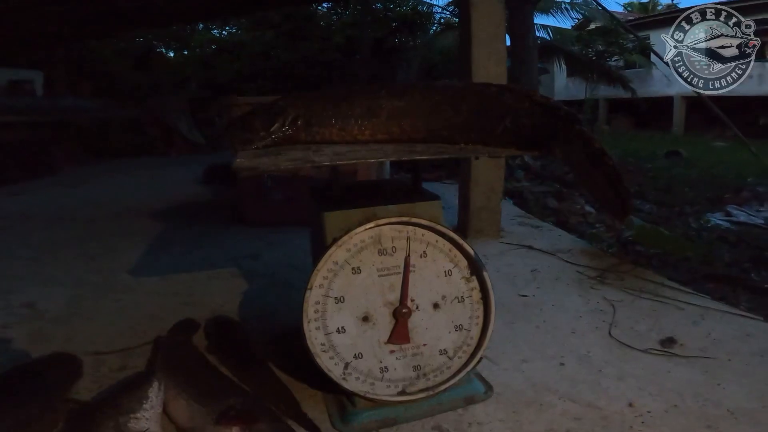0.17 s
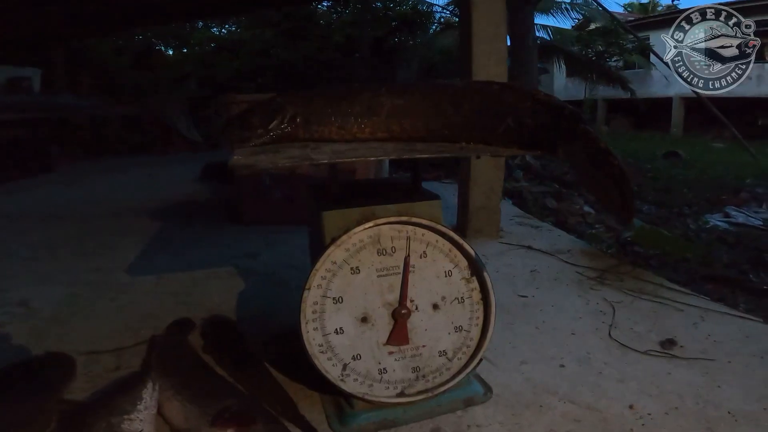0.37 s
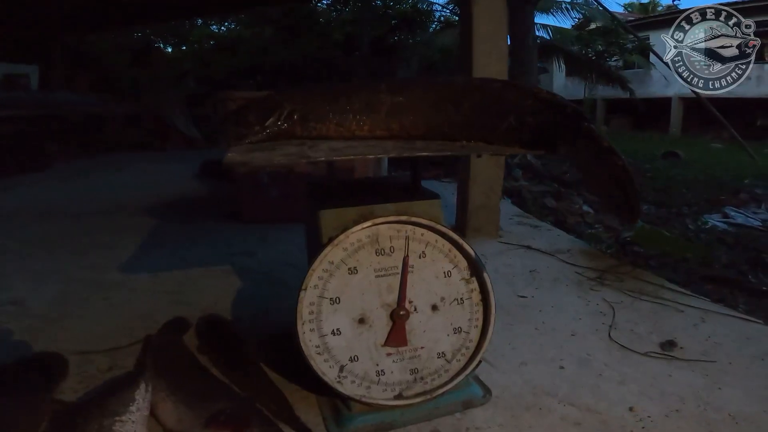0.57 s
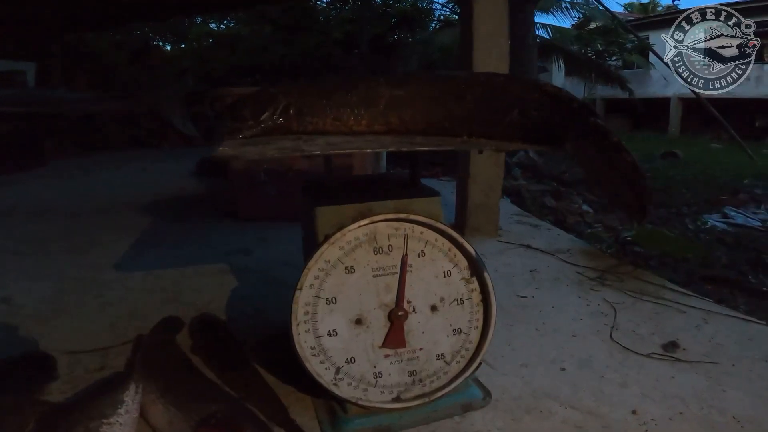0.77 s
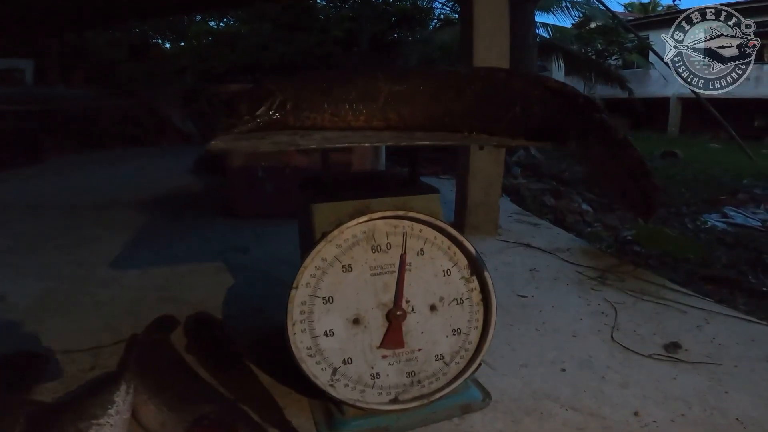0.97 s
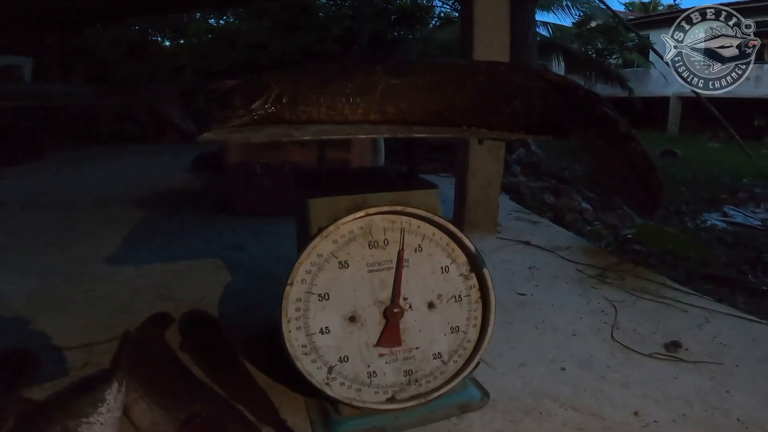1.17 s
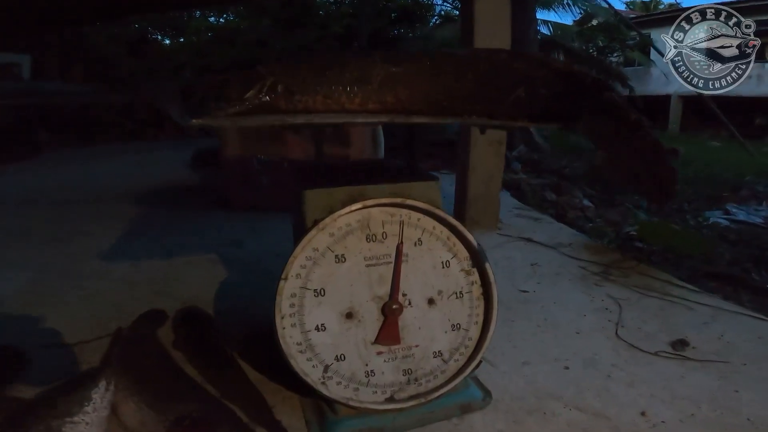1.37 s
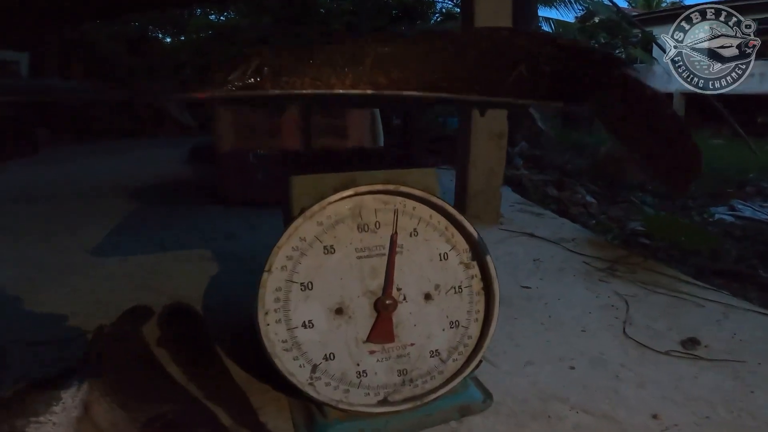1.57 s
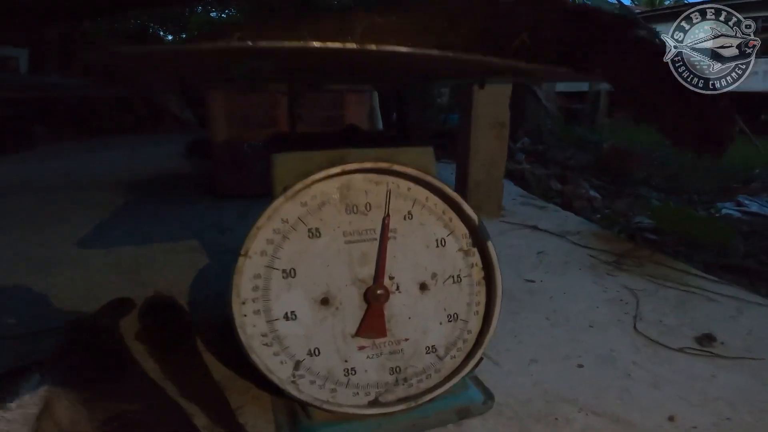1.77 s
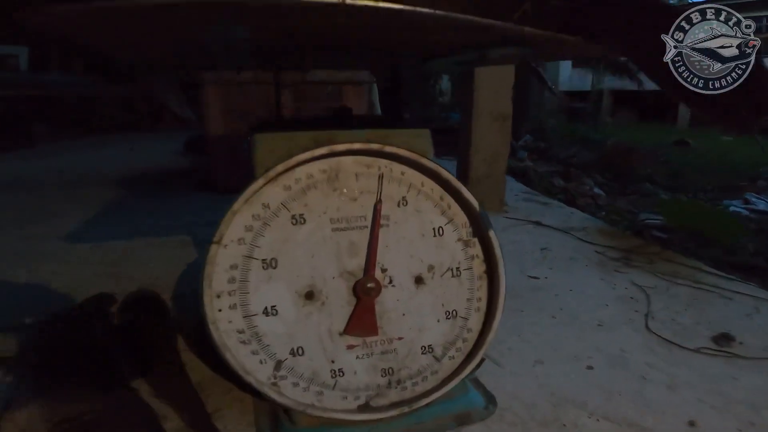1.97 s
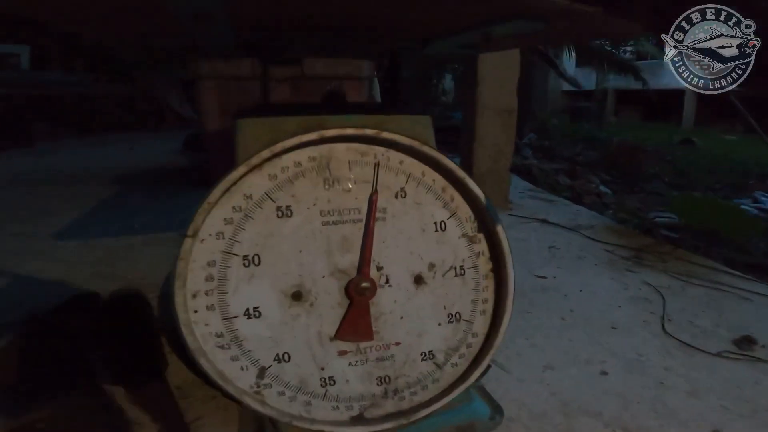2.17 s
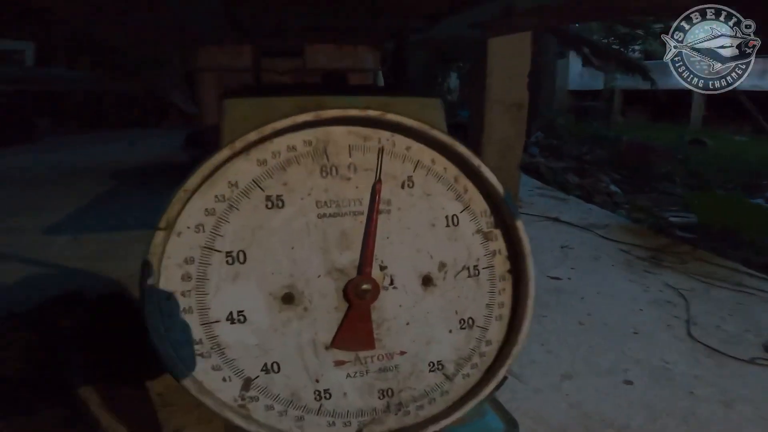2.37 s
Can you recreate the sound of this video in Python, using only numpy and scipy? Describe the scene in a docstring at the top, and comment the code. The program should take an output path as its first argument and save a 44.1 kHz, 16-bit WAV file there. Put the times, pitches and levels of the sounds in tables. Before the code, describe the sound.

Crickets chirp rapidly in step over a low engine rumble, with a hollow knock and light rustling nearby

```python
"""After a short silence the scene fades in: crickets chirp in step five times a second over an engine's rumble.
Their down-swept wing strokes are smeared by garden echoes, while farther insects trill and buzz as pulsing noise.
The engine is wavering sine lines over low noise. Close by, grains of noise scuff and rustle, with light ticks,
and blows in quick succession ring a hollow body as one knock. Soft low bumps come from a moved microphone.
Still evening air, a softly wavering noise, lies under it all."""
import sys
import numpy as np
from scipy import signal
from scipy.fft import rfft, irfft
from scipy.io import wavfile
from scipy.ndimage import uniform_filter1d

SR = 44100
rng = np.random.default_rng(int(sys.argv[2]) if len(sys.argv) > 2 else 0)


def to_wav(s):
    """Save 16-bit WAV."""
    ch = np.atleast_2d(s).T  # columns
    pcm = np.round(np.clip(ch, -1, 1) * 32767)  # PCM
    wavfile.write(sys.argv[1], SR, pcm.astype(np.int16))


N = 106104


def undb(db):
    """Decibels to gain."""
    return 10 ** (np.asarray(db) / 20)


def level(x, db):
    """Set the rms level in dB."""
    return x * undb(db) / np.sqrt(np.mean(x ** 2) + 1e-30)


def clock():
    """Time of each sample in seconds."""
    return np.arange(N) / SR


def noise():
    """White noise for the whole scene."""
    return rng.standard_normal(N)


def walk(rate):
    """Random levels held 1 / rate s and smoothed twice into a slow drift; spread near 1."""
    hold = int(SR / rate)
    steps = np.repeat(noise()[:N // hold + 1], hold)
    return 1.3 * uniform_filter1d(uniform_filter1d(steps, hold), hold)[:N]


def wavering_phase(hz, depth, rate):
    """Running cycle count of a rate in Hz that drifts by a share of itself."""
    return np.cumsum(hz * (1 + depth * walk(rate))) / SR


def colour(x, points):
    """Shape a sound's spectrum by (Hz, dB) points, to rms 1."""
    hz, db = np.array(points).T
    f = np.maximum(np.fft.rfftfreq(N, 1 / SR), 1)
    gain = undb(np.interp(np.log(f), np.log(hz), db))
    return level(irfft(rfft(x) * gain, N), 0)


def ring(x, hz, width):
    """A steep resonance of four equal poles, to rms 1."""
    f = np.fft.rfftfreq(N, 1 / SR)
    return level(irfft(rfft(x) / (1 + 1j * (f - hz) / width) ** 4, N), 0)


# Colour of still evening air. Each row: frequency in Hz, density in dB per Hz.
AIR_COLOUR = [(200, -0.5), (450, 1.5), (850, -8.5), (1050, -1), (1230, 0.5), (1700, -8), (3400, -12.5),
              (6000, -12), (9200, -12.5), (11000, -12), (12000, -34.5), (14000, -29)]
AIR_DB = -68.5


def air():
    """Coloured noise whose level wavers softly by about 1 dB."""
    return colour(noise(), AIR_COLOUR) * undb(AIR_DB + walk(10.42))


# Engine hum lines. Each row: frequency in Hz, level in dB.
HUM_LINES = [(26.6, -53.5), (53.1, -54.5), (67.5, -61), (79.5, -66), (100, -70), (167.5, -63.5), (211, -65),
             (302.5, -74), (363, -83)]
HUM_WAVER, HUM_FLUTTER_DB = 0.0041, 1  # pitch drift as a share, level drift in dB
# Colour of the engine's rumble. Each row: frequency in Hz, density in dB per Hz.
RUMBLE_COLOUR = [(10, -9), (22, -4.5), (38, 3.5), (60, -6), (95, -11.5), (160, -5), (215, -11), (250, -16),
                 (330, -23), (500, -30)]
# Swell of the rumble. Each row: time in seconds, level in dB.
RUMBLE_LEVEL = [(.18, -53.5), (.27, -47), (0.561, -45), (.68, -54), (1.2, -57), (1.85, -54.5), (2.4, -53.5)]


def engine(top_hz=450):
    """Hum lines that waver in pitch and level, over low-passed noise that swells and sinks."""
    hum = np.zeros(N)
    for hz, db in HUM_LINES:
        phase = rng.random() + wavering_phase(hz, HUM_WAVER, 6.03)
        flutter = undb(HUM_FLUTTER_DB * walk(7.926))
        hum += level(np.sin(2 * np.pi * phase) * flutter, db)
    low_pass = signal.butter(4, top_hz, fs=SR, output="sos")
    rumble = signal.sosfilt(low_pass, colour(noise(), RUMBLE_COLOUR))
    return hum + rumble * undb(np.interp(clock(), *np.array(RUMBLE_LEVEL).T))


def trill(hz, width, rate, depth=0.16):
    """A far insect's rasp: noise in a wing resonance, throbbing at its stroke rate."""
    throb = 1 + depth * np.sin(2 * np.pi * wavering_phase(rate, .05, 8))
    return level(ring(noise(), hz, width) * throb, 0)


# Steady trills of farther insects.
# Each row: pitch in Hz, half-width of each resonance pole in Hz, pulses per second, level in dB.
TRILLS = [(4624, 26, 12, -78.5), (5125, 24, 78, -77), (4760, 600, 39, -68), (7160, 790, 73, -77.5),
          (7920, 900, 48, -76), (10340, 720, 130, -80), (13200, 700, 80, -91)]
# Short high buzzes. Each row: start in seconds, length in seconds, pitch in Hz, level in dB.
BUZZES = [(0.354, 0.35, 7790, -72), (.76, 0.21, 7590, -74.5), (1.35, .17, 7820, -75.5),
          (1.586, 0.347, 7700, -77), (2.117, .16, 8110, -79)]


def insects(buzz_width_hz=260, buzz_rate=150, edge_s=0.033):
    """Wing rasps held as steady trills, joined by rasps gated into short buzzes."""
    t = clock()
    out = sum(undb(db) * trill(hz, width, rate) for hz, width, rate, db in TRILLS)
    for start, length, hz, db in BUZZES:
        gate = np.clip(np.minimum(t - start, start + length - t) / edge_s, 0, 1)
        out = out + undb(db) * gate * trill(hz, buzz_width_hz, buzz_rate)
    return out


# Soft low bumps as the microphone is moved. Each row: peak in seconds, level in dB.
BUMPS = [(.31, -38), (0.577, -43), (1.38, -45), (1.52, -43.5), (1.975, -43.5), (2.119, -43.5), (2.26, -44),
         (2.379, -39)]
BUMP_HZ, BUMP_S = 57.61, 0.018


def bumps():
    """A few slow cycles of the microphone's housing for each small jolt."""
    t, out = clock(), np.zeros(N)
    for peak, db in BUMPS:
        swell = np.exp(-((t - peak) / BUMP_S) ** 2)
        out += undb(db) * swell * np.sin(2 * np.pi * (BUMP_HZ * t + rng.random()))
    return out


# Scuffs and rustles.
# Each row: peak in seconds, rise in seconds, decay in seconds, level in dB, share of thin rasp from 0 to 1.
SCUFFS = [(0.326, 0.061, 0.049, -59, 0.24), (0.491, 0.026, 0.076, -49, 0.04),
          (0.533, 0.025, 0.019, -58, 0.07), (.755, 0.043, 0.036, -65.5, 0.04),
          (0.927, .01, 0.02, -62, 0.12), (.953, .012, 0.046, -61, .05), (1.07, 0.032, 0.045, -72, 0.6),
          (1.31, 0.025, 0.07, -73.5, 0.9), (1.53, 0.015, 0.023, -71, 0.7),
          (1.74, 0.018, 0.056, -68.5, 0.45), (1.819, 0.034, 0.092, -63.5, .1),
          (1.94, 0.014, 0.046, -70.5, 0.55), (2.135, .012, 0.049, -64.5, 0.22),
          (2.261, .012, 0.033, -67, 0.28), (2.335, 0.022, 0.093, -67.5, 0.26)]
# Colour of the scuffs, ticks and knock contacts. Each row: frequency in Hz, density in dB per Hz.
SCUFF_COLOUR = [(150, 9), (400, -2.5), (850, -1.5), (1200, 5), (2400, -7.5), (4300, -2.5), (7000, -14),
                (10500, -22.5), (14000, -50)]
GRAINS_PER_S, GRAIN_SPREAD_DB = 5000, 1.5
RASP_HZ, RASP_WIDTH_HZ = 2364, 880


def scuffs():
    """Gritty rubbing: random grains that swell and die, partly through a thin rasping resonance."""
    t, out = clock(), np.zeros(N)
    hits = rng.random(N) < GRAINS_PER_S / SR
    grit = hits * noise() * undb(GRAIN_SPREAD_DB * noise())
    broad = colour(grit, SCUFF_COLOUR)
    thin = ring(grit[::-1], RASP_HZ, RASP_WIDTH_HZ)  # reversed so the two parts do not line up
    for peak, rise, decay, db, share in SCUFFS:
        share = np.clip(share, 0, 1)
        swell = np.exp(-np.where(t < peak, ((t - peak) / rise) ** 2, (t - peak) / decay))
        out += undb(db) * swell * (np.sqrt(1 - share) * broad + np.sqrt(share) * thin)
    return out


# Light dry ticks. Each row: start in seconds, starting level in dB.
TICKS = [(2.186, -52.5), (2.258, -78)]
TICK_DECAY_S = .004


def ticks():
    """Noise that starts at once and dies within milliseconds."""
    t = clock()
    envelope = sum(undb(db) * (t >= start) * np.exp(-abs(t - start) / TICK_DECAY_S) for start, db in TICKS)
    return colour(noise(), SCUFF_COLOUR) * envelope


# Blows heard together as one knock. Each row: start in seconds, level in dB.
KNOCKS = [(.463, -52.5), (0.479, -48.5), (.482, -42)]
# Ring of the knocked body. Each row: mode in Hz, level in dB relative to the blow, time to fall 60 dB in seconds.
BODY_MODES = [(371, -5, 0.29), (505, -5.5, 0.25), (609, 3, 0.061), (702, -1.5, 0.045), (800, -6.5, .15),
              (1030, -33, 0.1), (1206, -8, 0.21), (1300, -15, 0.16), (1562, -13, 0.18), (1663, -10.5, 0.2)]
CONTACT_S, ATTACK_S = 0.0034, 0.00077


def knocks(click_db=-10):
    """Soft blows ring the modes of a hollow body, each with a short contact noise."""
    t, out = clock(), np.zeros(N)
    for start, db in KNOCKS:
        age = np.maximum(t - start, 0)
        modes = np.zeros(N)
        for hz, mode_db, t60 in BODY_MODES:
            decay = np.exp(-np.log(1000) * age / t60)
            modes += undb(mode_db) * np.sin(2 * np.pi * (hz * age + rng.random())) * decay
        click = undb(click_db) * colour(noise(), SCUFF_COLOUR) * np.exp(-age / CONTACT_S)
        attack = 1 - np.exp(-age / ATTACK_S)  # zero until the blow
        out += undb(db) * attack * (modes + click)
    return out


GARDEN_T60_S, GARDEN_DB = 0.6, -6


def garden(x):
    """Add the dense echoes of leaves and walls as a decaying noise tail."""
    tail = noise() * np.exp(-np.log(1000) * clock() / GARDEN_T60_S)
    return x + undb(GARDEN_DB) * signal.fftconvolve(x, tail / np.linalg.norm(tail))[:N]


# Cricket chirps. Each row: start in seconds, length in seconds, level in dB relative to the other chirps,
# pitch in Hz at mid-stroke and mid-chirp.
CHIRPS = [(0.191, 0.1128, 1.5, 4784), (.345, .16, 3, 4775), (0.561, 0.1344, 2, 4770),
          (0.761, 0.1206, 1, 4744), (.94, 0.15, 0, 4775), (1.138, 0.13, -1, 4790), (1.329, 0.15, -1, 4784),
          (1.525, .14, 0, 4790), (1.719, 0.139, 0.5, 4805), (1.908, 0.17, 0.5, 4816),
          (2.107, 0.15, 1, 4843), (2.304, 0.15, 1, 4803)]
STROKE_RATE_HZ, STROKE_FALL_HZ, CHIRP_SAG_HZ = 120, 1060, 80.44
STROKE_JITTER, PITCH_SPREAD = .14, 0.003984  # drifts as a share of rate and of pitch


def cricket():
    """Chirps made of quick wing strokes, each a tone that falls in pitch; the pitch sags through a chirp."""
    t = clock()
    rows = np.array(CHIRPS)
    latest = np.maximum(np.searchsorted(rows[:, 0], t) - 1, 0)
    start, length, db, pitch_hz = rows[latest].T
    progress = np.clip((t - start) / length, 0, 1)
    chirp = undb(db) * np.sqrt(np.sin(np.pi * progress).clip(0))
    stroke = (rng.random() + wavering_phase(STROKE_RATE_HZ, STROKE_JITTER, 50)) % 1  # 0-1 in each stroke
    swept_hz = pitch_hz - STROKE_FALL_HZ * (stroke - .5) - CHIRP_SAG_HZ * (progress - .5)
    tone = np.sin(2 * np.pi * wavering_phase(swept_hz, PITCH_SPREAD, 60))
    return chirp * np.minimum(2 * np.sin(np.pi * stroke), 1) * tone


# Passband of the crickets' wings. Each row: frequency in Hz, gain in dB.
WING_PASSBAND = [(4000, -28), (4250, -11), (4400, -2), (4650, 0), (5000, 1), (5160, 2), (5270, -6),
                 (5450, -24)]
CRICKET_DB = -61.5


def chorus(count=3):
    """Several crickets keep in step, their strokes held within the wings' passband."""
    wings = colour(sum(cricket() for _ in range(count)), WING_PASSBAND)
    return level(garden(wings), CRICKET_DB)


def scene():
    """Air, engine and far insects behind the handling sounds and the crickets."""
    background = air() + engine() + insects()
    handling = bumps() + scuffs() + ticks() + knocks()
    return (background + handling + chorus())[None]


FADE_START_S, FADE_END_S = 0.14, 0.21
TOP_HZ = 14200


def record(dry):
    """Fade in from silence and cut the top with a steep low-pass."""
    fade = np.clip((clock() - FADE_START_S) / (FADE_END_S - FADE_START_S), 0, 1) ** 2.19
    low_pass = signal.ellip(8, .2, 70, TOP_HZ, fs=SR, output="sos")
    return signal.sosfilt(low_pass, dry * fade)


dry = scene()
out = record(dry)
to_wav(out)
```